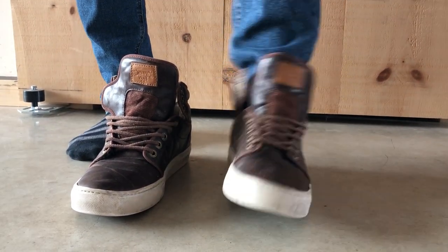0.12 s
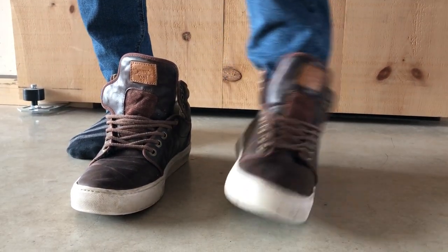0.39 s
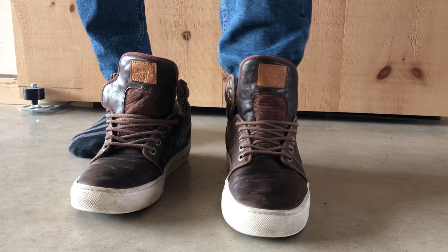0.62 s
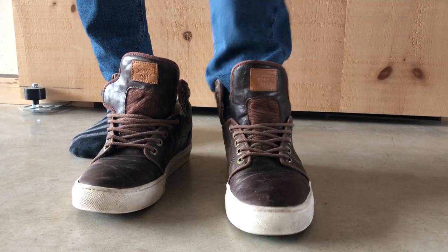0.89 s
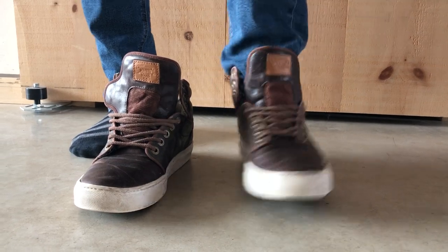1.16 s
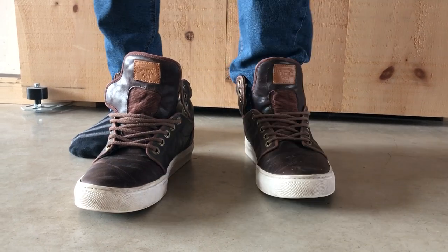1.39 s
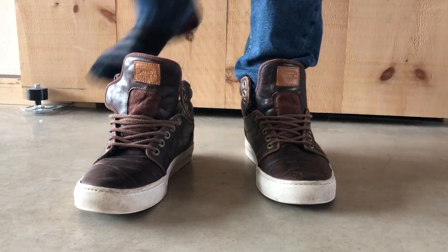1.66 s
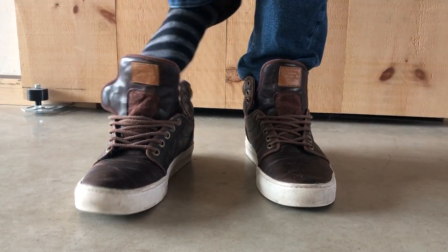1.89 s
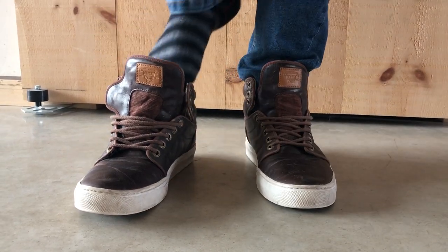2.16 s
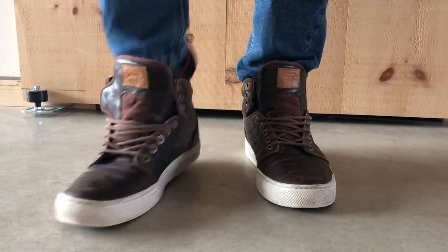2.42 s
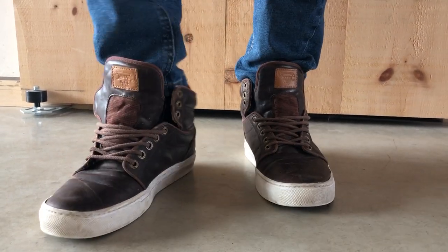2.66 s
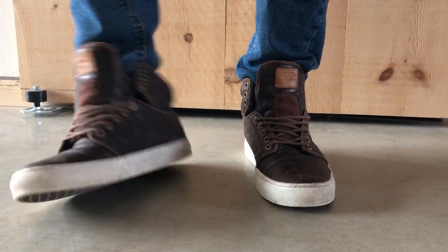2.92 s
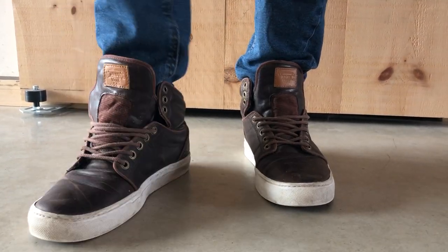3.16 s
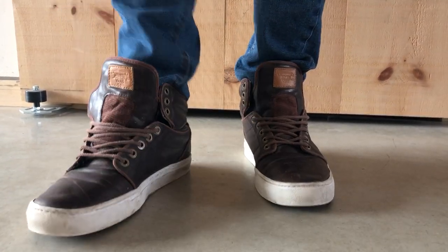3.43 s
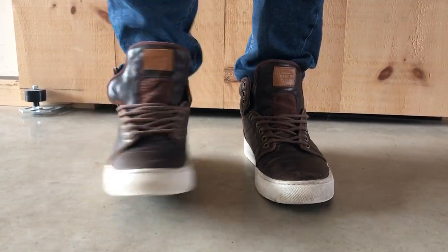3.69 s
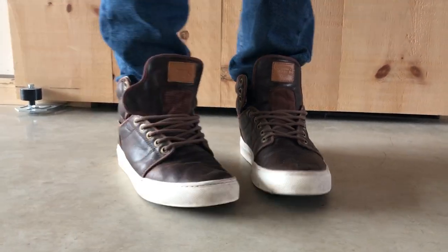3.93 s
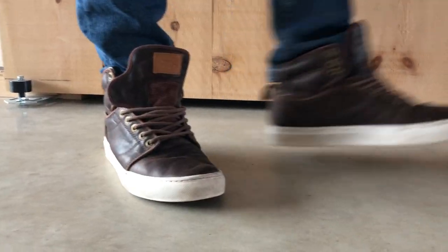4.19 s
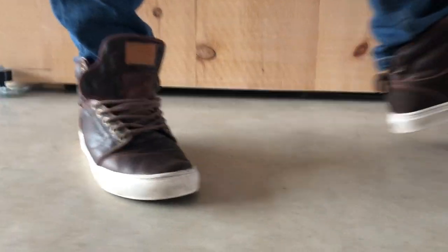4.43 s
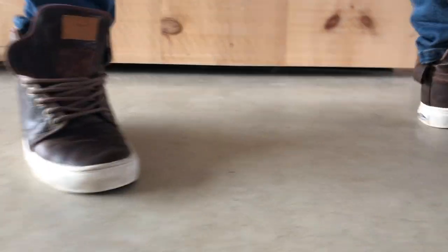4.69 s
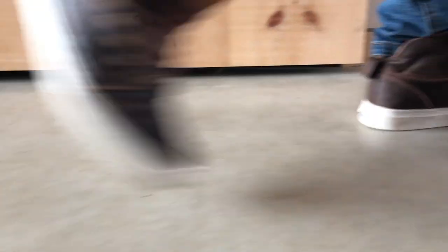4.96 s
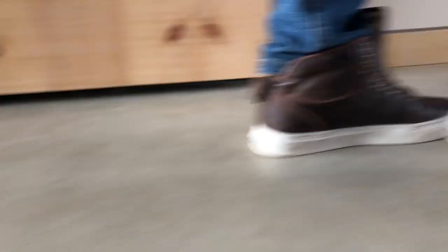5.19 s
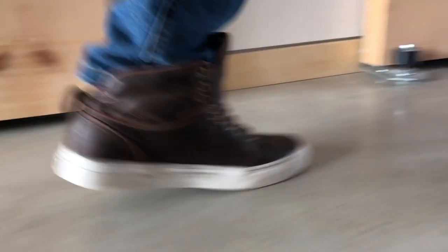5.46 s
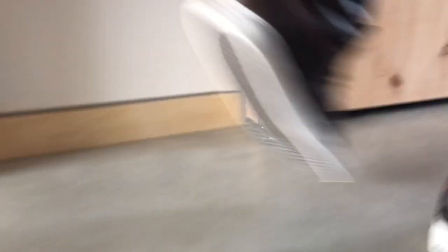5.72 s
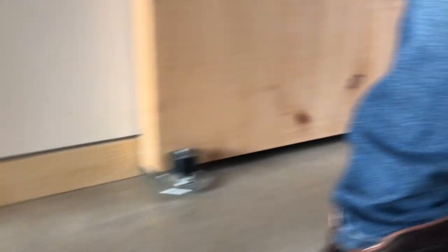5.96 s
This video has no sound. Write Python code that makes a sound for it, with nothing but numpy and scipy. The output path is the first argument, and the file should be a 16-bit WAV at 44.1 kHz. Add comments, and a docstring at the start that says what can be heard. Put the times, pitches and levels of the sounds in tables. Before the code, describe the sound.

Rubber-soled leather boots thump, scuff and creak on smooth concrete in a hard room, with brief high squeaks, then step away past the microphone.

```python
"""Rubber-soled leather boots are pulled on, shuffled and walked off on smooth concrete, close to a phone's microphone.
Soles slap and thud as short sagging tones, slide over fine grit as random grains, and squeak as gliding tones.
Leather creaks as resonating slips and trouser cloth rustles. A hard room answers with a dense decaying tail.
Behind it lie steady noise, a faint wavering hum and a low rumble that swells with the thumps and as the phone is handled."""
import sys
import numpy as np
from scipy import signal
from scipy.fft import rfft, irfft, next_fast_len
from scipy.io import wavfile
from scipy.ndimage import uniform_filter1d

SR = 44100
rng = np.random.default_rng(int(sys.argv[2]) if len(sys.argv) > 2 else 0)


def volts_from_decibels(level):
    """Turn decibel levels (scalar or array-like) into linear amplitude factors."""
    exponent = np.asarray(level, float) / 20
    return 10 ** exponent


def materialize(psi):
    """Save the field psi as 16-bit PCM at rate SR to the path in sys.argv[1].

    A 1-D psi becomes a single channel; in a 2-D psi each row is a channel.
    """
    bounded = np.clip(np.atleast_2d(psi).T, -1, 1)
    quanta = np.round(bounded * 32767).astype(np.int16)
    wavfile.write(sys.argv[1], SR, quanta)


N = 268521
T = np.arange(N) / SR  # s

# Sole meets concrete, close by:
# [t/s, thud peak level/dB, thud settled f/Hz, slap peak level/dB, floor thump peak level/dB]
FOOTFALLS = [(0.042, -42.5, 442.7, -53, -51.5), (0.312, -48, 190, -70, -52), (0.5445, -35, 480, -30, -47),
             (0.759, -49, 274.3, -57.5, -50.5), (0.92, -39, 576.9, -56, -61.5),
             (1.18, -53.5, 495.9, -63.5, -55), (1.3713, -30, 600, -23, -38),
             (1.397, -30.5, 511.2, -44, -48), (1.926, -48, 434.2, -63.5, -58.5),
             (1.941, -35, 443.9, -55.5, -57), (2.008, -49, 383.3, -66, -48), (2.066, -46, 424, -60, -56.5),
             (2.293, -46, 390.7, -59.5, -62.5), (2.612, -46, 200, -60, -50), (2.742, -43, 280, -65, -55),
             (2.752, -42, 270, -70, -58), (2.762, -41, 290, -70, -58), (2.954, -48, 574.1, -52, -58),
             (3.1865, -30, 718, -32, -41), (3.212, -43.5, 417.2, -53, -41.5), (3.295, -46, 378.2, -58, -45),
             (3.362, -46, 256.6, -52, -53), (3.422, -42, 248.8, -60, -63), (3.452, -45.5, 388.2, -54, -61),
             (3.91, -33.5, 480, -42, -40.5), (3.934, -36, 415.6, -54, -48), (4.738, -36, 450, -53, -42),
             (4.815, -52, 400, -62, -46.5), (4.929, -46, 426.8, -45, -53), (5.4895, -39, 340, -51, -43),
             (5.629, -46, 392.6, -53, -59), (5.66, -51, 595.7, -55, -65.5), (5.775, -56, 170, -70, -50),
             (5.825, -55, 170, -70, -49), (5.942, -60, 170, -70, -52)]
# The tread rings after a slap: [f/Hz, width/Hz, level/dB]
TREAD_RINGS = [(620, 250, 2), (1280, 300, 7), (2050, 400, -1), (3500, 900, 0.5)]
# A harder slap is brighter: this pitch at this level, an octave higher for each further 34 dB
SLAP_HZ, SLAP_AT_DB, SLAP_DB_PER_OCTAVE = 1450, -40, 34
THUMP_HZ = 125  # settled pitch


def steps():
    """The tread slaps first and rings, the hollow boot thuds just after, the floor takes the weight last."""
    blows, slaps = np.zeros(N), np.zeros(N)
    for s, thud_db, thud_hz, slap_db, thump_db in FOOTFALLS:
        octaves = (slap_db - SLAP_AT_DB) / SLAP_DB_PER_OCTAVE
        slap_hz = SLAP_HZ * 2 ** octaves
        add(slaps, s + 0.0010071, blow(slap_hz, slap_db, turns=0.54, glide=0.61))
        add(blows, s + 0.0021241, blow(thud_hz, thud_db, turns=1.0768, glide=0.4475))
        add(blows, s + 0.0041873, blow(THUMP_HZ, thump_db, turns=0.69, glide=0.8255))
    ringing = sum(volts_from_decibels(db) * ring(slaps, hz, width_hz) for hz, width_hz, db in TREAD_RINGS)
    return blows + slaps + ringing


# The tread slides over the floor; a negative time leaves its row at least 60 dB down:
# [loudest t/s, t to swell 20 dB/s, t to fade 20 dB/s, grit level/dB, fine hiss level/dB]
SLIDES = [(.02, 0.26, 0.0951, -59.5, -72), (.096, 0.0664, 0.1585, -58.5, -63.5), (.285, .04, .15, -59, -70),
          (.34, .1, .17, -60, -68), (.555, .01, .08, -60, -80), (.68, 0.1065, 0.3135, -67, -76.5),
          (.755, .05, .03, -65, -70), (.8, .05, .12, -61.5, -72), (.91, 0.1178, .1, -61, -66),
          (.96, .1, .13, -61, -68), (1.186, 0.2359, -0.0068, -71.5, -84), (1.39, .02, .2, -62, -85),
          (1.645, .12, .04, -69, -69), (1.76, .25, .15, -74, -75), (1.945, 0.0512, .025, -65.5, -66),
          (2.035, .03, .03, -74, -80), (2.07, .015, 0.1174, -65, -74), (2.26, .015, .04, -78, -70),
          (2.293, .012, .2, -64, -64), (2.36, .1, .2, -69.5, -72), (2.46, .3, 0.055, -62, -68),
          (2.535, .06, .1, -52, -65.5), (2.57, .06, .04, -54, -62), (2.598, .15, .015, -52, -58.5),
          (2.63, .03, .08, -66, -75), (2.725, .02, .2, -64, -72), (2.755, .05, .08, -66, -67),
          (2.83, 0.2673, .08, -63, -76), (2.914, .014, .07, -48, -60), (2.975, 0.0865, .05, -51, -59),
          (3.05, .05, .15, -58, -64), (3.09, .1, .05, -56, -63), (3.196, 0.0259, 0.0517, -48.5, -60),
          (3.475, 0.2905, 0.1966, -56, -66), (3.585, .02, .02, -66, -76), (3.663, .035, .03, -57, -59),
          (3.925, .02, .04, -60, -73), (4.09, 0.0274, .05, -53, -71), (4.105, .04, .05, -51, -70),
          (4.125, .04, .04, -54, -70), (4.14, .06, .02, -57, -66), (4.933, .005, 0.0794, -65, -68),
          (5.62, 0.1646, 0.1255, -63, -70.5), (5.854, 0.0479, .2, -58, -61), (6.04, .1, .15, -60.5, -60)]
# Tone of the rolling grit: [f/Hz, relative level per Hz/dB]
GRIT_TONE = [(1300, -31.5), (1900, -2), (2300, -3), (3200, -2.5), (4500, -3.5), (6000, -8.5), (8000, -18)]
# Tone of the fine hiss: [f/Hz, relative level per Hz/dB]
HISS_TONE = [(4000, -30.5), (6000, 3.5), (8000, 8.5), (12000, 5), (15600, 5), (17000, -21.5)]
RUSTLE_HISS_DB = -8  # hiss of the cloth beside its grit


def grit_slide():
    """Grit rolls under the tread with an uneven level; cloth and rubber hiss in denser grains."""
    rustle = cloth_rustle()
    slide_gain = swells(row[:4] for row in SLIDES) * volts_from_decibels(2.4542 * walk(40))
    cloth_gain = rustle * volts_from_decibels(.8 * walk(25))
    grit_gain = np.hypot(slide_gain, cloth_gain)
    rubber_gain = swells(row[:3] + row[4:] for row in SLIDES)
    hiss_gain = np.hypot(rubber_gain, volts_from_decibels(RUSTLE_HISS_DB) * rustle)
    grit = colour(grains(rate=8000, spread_db=2.1), GRIT_TONE)
    hiss = colour(grains(rate=15000, spread_db=1.9729), HISS_TONE)
    return grit_gain * grit + hiss_gain * hiss


# The boot bends or settles; a negative time leaves its row at least 60 dB down:
# [loudest t/s, t to swell 20 dB/s, t to fade 20 dB/s, leather creak level/dB, sole scrape level/dB]
BENDS = [(.046, 0.4848, 0.0911, -56.5, -63), (.1, 0.1833, 0.2916, -62, -66.5), (.285, .03, .1, -56, -58),
         (.315, .04, .1, -51, -58), (.37, .1, .12, -55, -62), (.554, .006, .06, -45, -52),
         (.6, .05, .2, -59, -63), (.68, .06, .1, -56, -65), (.769, -0.033, 0.0827, -52.5, -65.5),
         (.925, .09, .08, -44.5, -50), (.97, .05, .07, -50, -55), (1.08, .15, .3, -65, -74),
         (1.186, -0.0158, 0.0733, -55, -77.5), (1.38, .006, .05, -48, -55), (1.415, .03, 0.0653, -47, -56),
         (1.46, 0.0399, 0.3459, -57.5, -64.5), (1.941, 0.0295, 0.029, -47, -61.5),
         (2.078, 0.0943, 0.06, -54, -69), (2.2, 0.2728, 0.23, -63, -89), (2.295, -0.0096, 0.3252, -57, -65),
         (2.5, 0.3823, 0.27, -56, -61.5), (2.6, 0.1269, 0.0631, -49.5, -57), (2.755, -0.0031, .1, -48, -65),
         (2.835, .1, .1, -57, -66), (2.971, 0.0494, 0.0782, -56.5, -66),
         (3.044, 0.0706, 0.1432, -47.5, -59), (3.194, 0.0373, 0.0576, -42, -46.5),
         (3.4, 0.3944, 0.1097, -55.5, -63), (3.465, .05, .1, -44, -55), (3.495, .08, .05, -42.5, -55),
         (3.64, 1.0729, 0.1497, -63, -67.5), (3.918, .006, .12, -46, -60), (3.945, .03, 0.0904, -47, -67),
         (4.03, .1, .15, -60, -78), (4.24, .1, .15, -66, -80), (4.522, .01, .03, -72, -66),
         (4.6, 0.0739, 0.4375, -68, -72.5), (4.745, .006, .09, -53, -62),
         (4.825, 0.0767, 0.0392, -56.5, -64.5), (4.933, .004, .04, -58, -60), (5.02, .08, .05, -61, -72),
         (5.36, -0.0159, 0.2535, -64, -73), (5.496, .006, .1, -55, -65), (5.633, .005, .06, -55, -58),
         (5.78, .05, 0.17, -60, -63), (5.84, .04, .12, -57, -57)]
# Resonances of the leather: [f/Hz, width/Hz, relative level/dB]
LEATHER_RINGS = [(181.09, 94.1, 3.5), (256.64, 41.745, 4), (306.21, 56.66, 3.5), (450, 100.21, 5),
                 (527.04, 126.42, 3.5), (676.16, 135.62, 1)]
# Tone of the sole scrape: [f/Hz, relative level per Hz/dB]
SCRAPE_TONE = [(600, -27), (850, 0), (1150, -2.5), (1500, -1.5), (1900, -8.5), (2600, -26)]
RUSTLE_SCRAPE_DB = -4  # scrape of the cloth beside its grit


def leather_and_scrape():
    """The same uneven slips ring the leather and scrape the sole, swelling together, each at its own level."""
    slips = grains(rate=2500, spread_db=2)
    creak = np.zeros(N)
    for k, (hz, width_hz, db) in enumerate(LEATHER_RINGS):
        creak += (-1) ** k * volts_from_decibels(db) * ring(slips, hz, width_hz)  # alternate sign
    creak_gain = swells(row[:4] for row in BENDS)
    sole_gain = swells(row[:3] + row[4:] for row in BENDS)
    scrape_gain = np.hypot(sole_gain, volts_from_decibels(RUSTLE_SCRAPE_DB) * cloth_rustle())
    return scrape_gain * colour(slips, SCRAPE_TONE) + creak_gain * unit(creak)


# Rubber sticks and slips at a whistling rate, one list a squeak: [t/s, slip f/Hz, level/dB]
SQUEAK_GLIDES = [
    [(.075, 4662, -75.5), (.080, 4992, -55.5), (.086, 5437, -69)],
    [(.095, 4684, -65.5), (.101, 4850, -50), (.108, 5050, -41), (.114, 5120, -40), (.117, 5200, -45),
     (.121, 5200, -65)],
    [(.109, 4382, -64.5), (.113, 4560, -45), (.121, 4570, -47), (.126, 4570, -51), (.131, 4570, -65)],
    [(2.906, 3994, -65), (2.909, 4400, -48), (2.912, 5325, -41), (2.914, 5500, -40), (2.9165, 5753, -29),
     (2.9185, 5825, -30), (2.9225, 5910, -21.5), (2.925, 5943, -29), (2.9275, 6000, -55)],
    [(3.189, 5614, -65.5), (3.203, 5500, -50.5), (3.210, 5389, -49.5), (3.214, 5399, -68)],
]
# Per squeak: [pitch tremble/share of f, extra level to the walls/dB, overtone level at start/dB, at end/dB]
SQUEAK_TRAITS = [(.004, 1, -20.5, -20.5), (0.0042, 12, 0.5, -14.5), (0.004213, 13, -20, -22),
                 (.006, 3.5, -13, -36), (0.027, 4.5, -25, -24.5)]


def squeaks():
    """Gliding, trembling slip tones with two overtones; row 0 is heard direct, row 1 feeds the walls."""
    out = np.zeros((2, N))
    tremble = walk(1500)
    for glide, (share, room_db, first_db, last_db) in zip(SQUEAK_GLIDES, SQUEAK_TRAITS):
        s, hz, db = np.transpose(glide)
        span = slice(int(s[0] * SR), int(s[-1] * SR))
        pitch = np.interp(T[span], s, hz) * (1 + share * tremble[span])
        phase = 2 * np.pi * np.cumsum(pitch) / SR
        overtone_gain = volts_from_decibels(np.linspace(first_db, last_db, len(phase)))
        overtones = np.sin(2 * phase) + volts_from_decibels(-8) * np.sin(3 * phase)
        tone = np.sin(phase) + overtone_gain * overtones
        level = np.sqrt(2) * volts_from_decibels(np.interp(T[span], s, db))  # fundamental's rms to peak
        out[:, span] += level * tone * volts_from_decibels(np.array([[0], [room_db]]))
    return out


# Trouser cloth rustles louder overall as the legs walk past: [t/s, level/dB]
CLOTH = [(4.2, -92), (4.45, -86.5), (4.6, -70), (4.9, -66.5), (5.07, -69), (5.4, -64.5), (5.6, -64),
         (5.75, -65), (6.09, -63.5)]


def cloth_rustle():
    """Gain of cloth rubbing on cloth, following the legs past the microphone."""
    return volts_from_decibels(np.interp(T, *np.transpose(CLOTH), left=-120))


# Hard walls around the floor: [f/Hz, time to fade 60 dB/s, echo level/dB]
WALLS = [(125.1, 0.46, -18), (354, 0.52, -13.5), (1000, 0.6653, -9.5), (2446.7, 0.5315, -10),
         (5500, 0.8, -20), (11026, .6, -28)]
FIRST_WALL_S = 0.0049


def room(x):
    """Hard walls return a dense tail that builds up to the first wall's delay; each pitch fades at its own pace."""
    f, t, noise = signal.stft(rng.standard_normal(SR), SR, nperseg=256)
    hz, t60, db = np.transpose(WALLS)
    t60 = np.interp(np.log(f + 1), np.log(hz), t60)[:, None]
    db = np.interp(np.log(f + 1), np.log(hz), db)[:, None]
    # the root evens out the energy of long and short fades
    fade = volts_from_decibels(-60 * t / t60) * np.sqrt(2 * np.log(1000) / (t60 * SR))
    tail = signal.istft(noise * volts_from_decibels(db) * fade, SR, nperseg=256)[1]
    build_up = np.clip(T[:len(tail)] / FIRST_WALL_S, 0, 1)
    return signal.fftconvolve(x, tail * build_up)[:N]


# One low swell as the phone is handled:
# [loudest t/s, t to swell 20 dB/s, t to fade 20 dB/s, rumble level/dB]
HANDLING_SWELL = (5.8, 1.2, .5, -62)
# Tone of the rumble: [f/Hz, relative level per Hz/dB]
RUMBLE_TONE = [(25, -36), (45, -7), (70, 6.5), (110, 3), (160, -18)]
RUMBLE_REST_DB, RUMBLE_UNDER_THUMP_DB = -75.5, -16
RUMBLE_SWELL_S, RUMBLE_FADE_S = .03, .17  # per 20 dB


def low_rumble():
    """Low noise of the slab swells around each thump, and once as the phone is handled, over a steady level."""
    weight = [(s, RUMBLE_SWELL_S, RUMBLE_FADE_S, thump_db + RUMBLE_UNDER_THUMP_DB)
              for s, *_, thump_db in FOOTFALLS]
    gain = np.hypot(swells(weight + [HANDLING_SWELL]), volts_from_decibels(RUMBLE_REST_DB))
    return gain * colour(rng.standard_normal(N), RUMBLE_TONE)


# Tone of the quiet room and microphone: [f/Hz, relative level per Hz/dB]
AIR_TONE = [(12, -51), (20, -34), (102, -4), (124, 5.5), (189, 1), (452, -7), (535, -7), (772, -10.5),
            (2060, -17.5), (2660, -19), (10200, -25.5), (15200, -23.5), (16500, -37.5)]
AIR_DB = -66.5
HUM_HZ, HUM_WIDTH_HZ, HUM_DB = 122.7, 12, -71


def air():
    """Steady room and microphone noise, and a mains hum that wavers as narrow resonant noise."""
    hum = unit(ring(rng.standard_normal(N), HUM_HZ, HUM_WIDTH_HZ))
    return volts_from_decibels(AIR_DB) * colour(rng.standard_normal(N), AIR_TONE) + volts_from_decibels(HUM_DB) * hum


def unit(x):
    """Scale to rms 1."""
    return x / np.sqrt(np.mean(x ** 2))


def colour(x, points):
    """Shape a signal by (Hz, dB) points joined over log frequency; rms 1."""
    hz, db = np.transpose(points)
    size = next_fast_len(len(x))
    axis = np.log(np.fft.rfftfreq(size, 1 / SR) + 1)
    gain = volts_from_decibels(np.interp(axis, np.log(hz), db, -90, -90))
    return unit(irfft(rfft(x, size) * gain, size)[:len(x)])


def ring(x, hz, width_hz):
    """One resonance."""
    return signal.lfilter(*signal.iirpeak(hz, hz / width_hz, SR), x)


def grains(rate, spread_db):
    """Tiny slips at random moments, rate per second, a few much larger than the rest."""
    chance = rng.random((3, N))
    happens = chance[0] < rate / SR
    size = volts_from_decibels(-spread_db * np.log(chance[2] + 1e-9))
    return happens * np.sign(chance[1] - .5) * size


def walk(rate):
    """Slow random wander, rate new values per second, smoothed; rms 1."""
    k = int(SR / rate)
    held = np.repeat(rng.standard_normal(N // k + 1), k)
    return unit(uniform_filter1d(held, k)[:N])


def blow(hz, db, turns, glide):
    """A few cycles that rise at once, sag in pitch to hz and die within some turns; db is the peak."""
    t = np.arange(int(8 * turns / hz * SR)) * hz / SR  # in cycles
    cycles = t + glide * turns * (1 - np.exp(-t / turns))
    shape = t * np.exp(-2 * t / turns) * np.sin(2 * np.pi * cycles)
    return volts_from_decibels(db) * shape / np.abs(shape).max()


def add(out, s, x):
    """Mix a short sound in at a time."""
    i = int(s * SR)
    out[i:i + len(x)] += x[:N - i]


def swells(rows):
    """Gain of swells summed in power; rows (loudest s, s to swell 20 dB, s to fade 20 dB, dB)."""
    power = np.zeros(N)
    for s, swell_s, fade_s, db in rows:
        # each is cut off 60 dB down
        span = slice(max(int((s - 3 * swell_s) * SR), 0), int((s + 3 * fade_s) * SR))
        late = T[span] - s
        drop_db = 20 * np.maximum(-late / swell_s, late / fade_s)
        power[span] += volts_from_decibels(2 * (db - drop_db))
    return np.sqrt(power)


def scene():
    """Boots close by, their echo, and the quiet room."""
    boots = steps() + grit_slide() + leather_and_scrape()
    squeak, squeak_to_walls = squeaks()
    echo = room(boots + squeak_to_walls)
    return (boots + squeak + echo + low_rumble() + air())[None]


def low_pass(x):
    """Removes everything above the highest recorded frequency."""
    return signal.sosfilt(signal.butter(12, 16910, fs=SR, output="sos"), x)


def record(dry):
    """The phone cuts the top steeply above 15.8 kHz."""
    top_cut = signal.ellip(10, .3, 60, 15800, fs=SR, output="sos")
    mix = signal.sosfilt(top_cut, dry)
    return low_pass(mix)


dry = scene()
out = record(dry)
materialize(out)
```